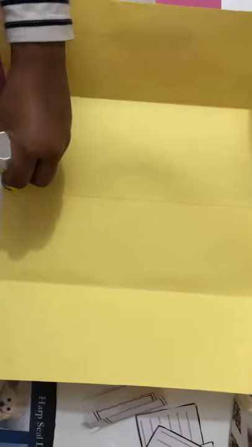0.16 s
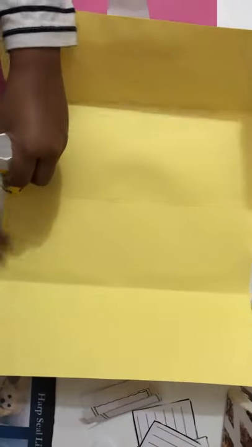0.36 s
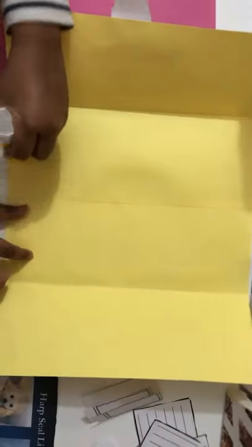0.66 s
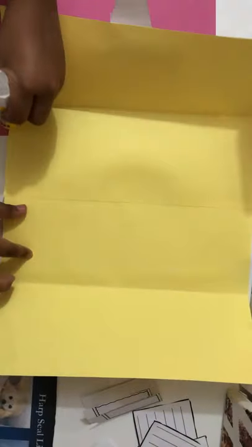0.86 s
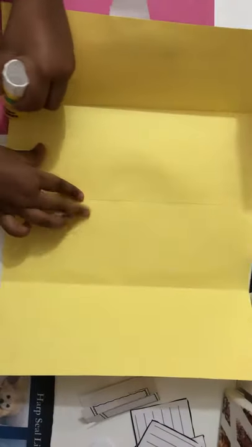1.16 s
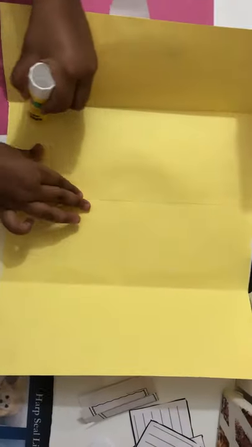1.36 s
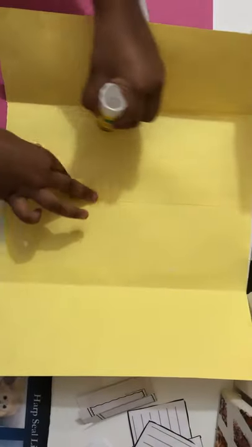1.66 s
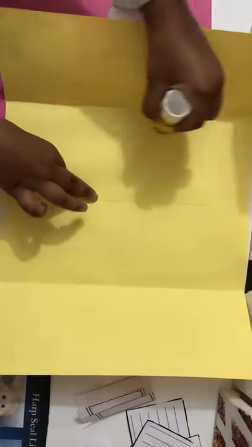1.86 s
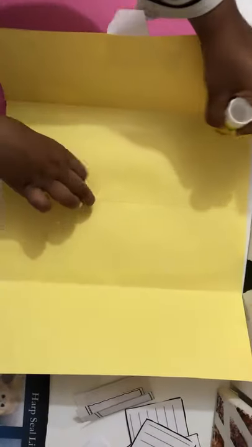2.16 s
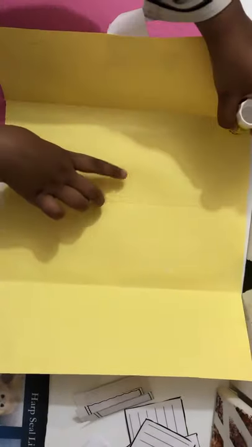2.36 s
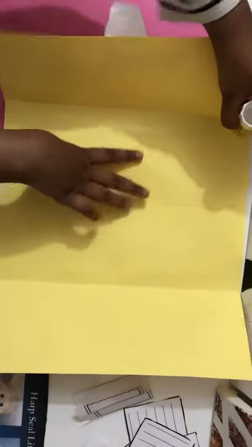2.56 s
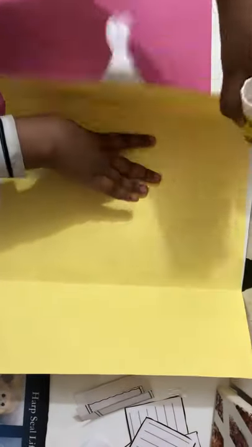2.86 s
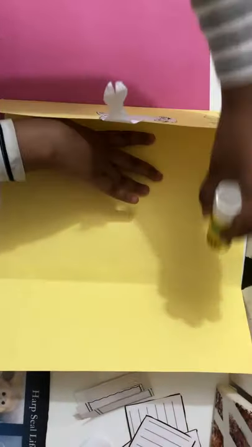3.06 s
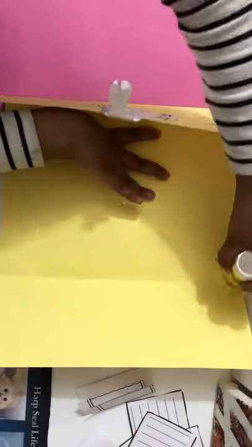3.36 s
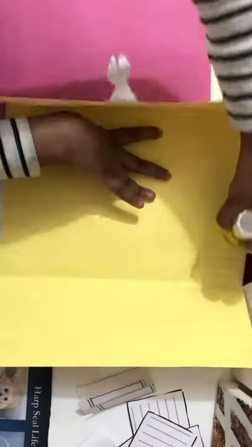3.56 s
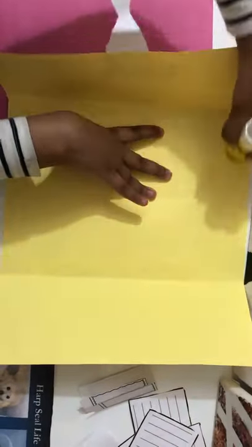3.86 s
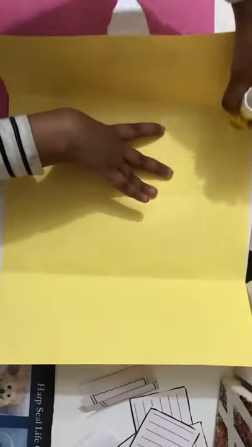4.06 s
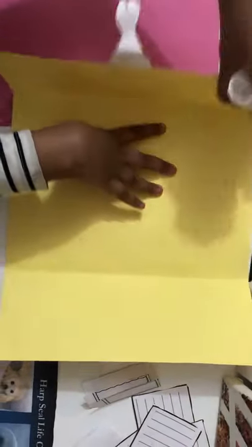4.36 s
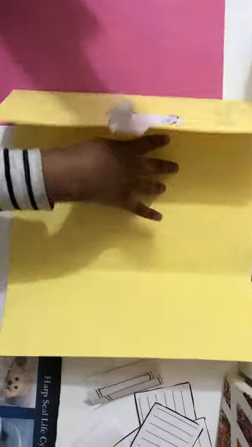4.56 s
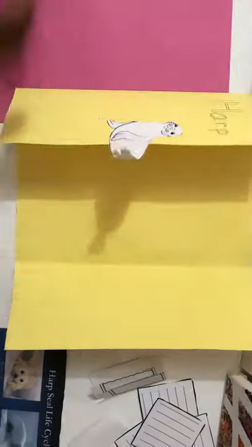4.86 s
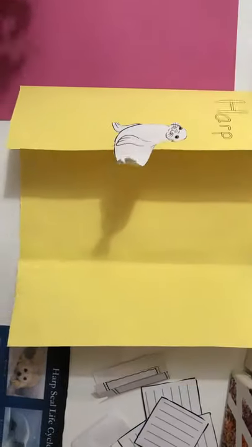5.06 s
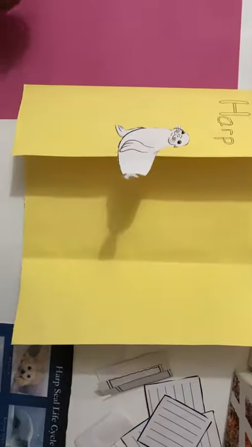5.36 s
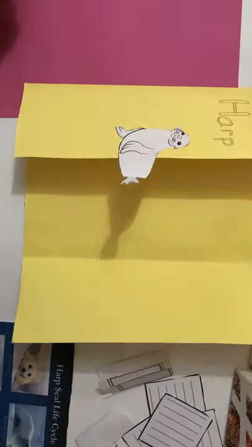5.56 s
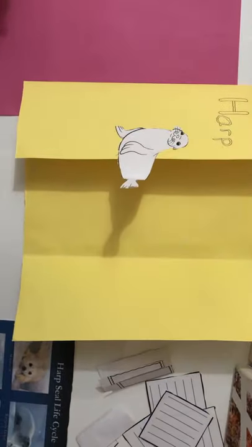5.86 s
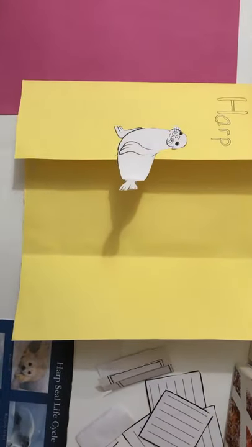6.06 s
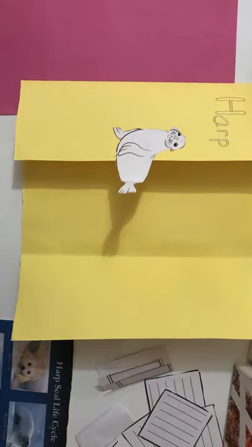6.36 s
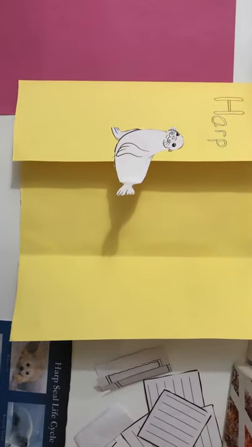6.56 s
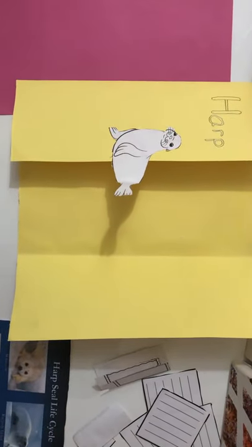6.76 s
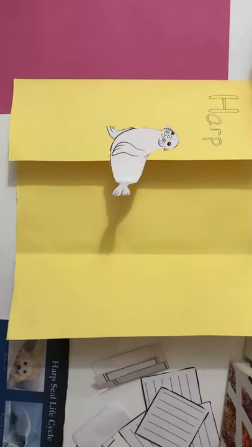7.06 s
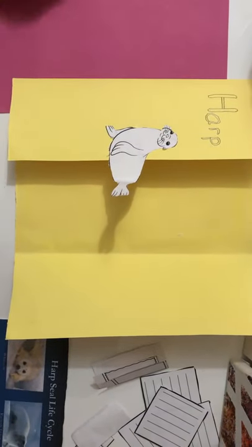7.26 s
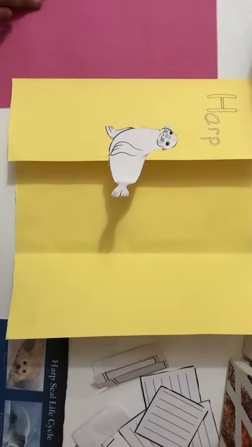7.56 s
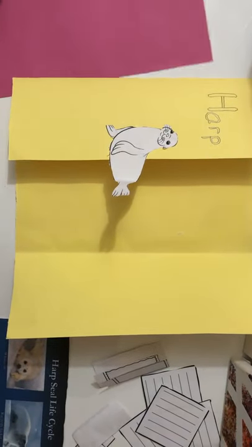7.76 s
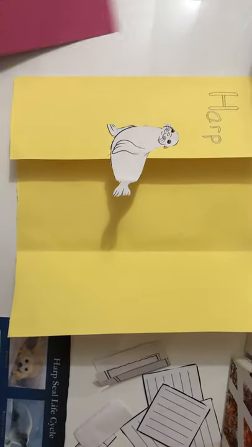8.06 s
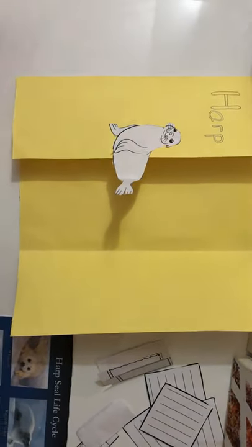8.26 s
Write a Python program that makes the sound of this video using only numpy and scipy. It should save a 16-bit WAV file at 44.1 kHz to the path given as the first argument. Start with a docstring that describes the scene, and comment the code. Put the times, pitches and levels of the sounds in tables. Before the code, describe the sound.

In a small, faintly humming room, close paper handling is heard: a glue stick swishing over card, brief scuffs, dull pops and light taps on a table. The rubbing thins to a few faint ticks. Near the end a hard object knocks sharply on the tabletop, the loudest sound, and a paper sheet slides off, fluttering and catching as it goes.

```python
"""A glue stick rubs along folded card on a table in a small room, hissing by stick-slip friction.
The card scuffs, buckles with dull pops and ticks as its edges flick free; blows of stick and hands
excite the damped modes of the tabletop. Something hard is set down with one sharp knock, then a sheet
is dragged away, fluttering and catching. A ceiling echo and a short reverberation follow the sounds,
over the low rumble and hum of the room."""
import sys
import numpy as np
from scipy import signal
from scipy.fft import rfft, irfft, next_fast_len
from scipy.io import wavfile
from scipy.ndimage import uniform_filter1d, map_coordinates

SR = 44100
rng = np.random.default_rng(int(sys.argv[2]) if len(sys.argv) > 2 else 0)


def to_wav(sig):
    """Store sig (one row per channel, or 1-D mono) as 16-bit WAV at the path in sys.argv[1].

    Samples outside -1..1 are clipped; the rate is SR.
    """
    pcm = np.clip(np.atleast_2d(sig), -1, 1) * 32767
    pcm = np.round(pcm).astype(np.int16)
    wavfile.write(sys.argv[1], SR, pcm.T)  # frames by channels


N = 370440

# spectrum of the room's rumble and hiss: f/Hz, level/dB
AIR_SPECTRUM = [(15, -19), (25, -54), (47, -8), (102, 1.5), (123, -4), (200, -5.5), (222, -12.5),
                (342, -15), (500, -24.5), (857, -29), (1320, -34), (2890, -36), (4450, -38), (8970, -38.5),
                (15800, -43)]
# narrow bands of hum and whine: f/Hz, rms level/dB
HUM_BANDS = [(54, -66), (99, -67), (193, -67), (1712, -91.5), (8694, -82)]
# quick scuffs: start t/s, end t/s, final level/dB
SCUFF_SPANS = [(0.044, 0.118, -52.5), (0.136, 0.181, -42.5), (0.83, 0.863, -53.5), (1.162, 1.207, -51),
               (2.128, 2.15, -42), (2.174, 2.269, -51.5), (2.381, 2.431, -51), (2.431, 2.466, -48.5),
               (2.576, 2.592, -52.5), (4.34, 4.359, -52), (4.628, 4.636, -42), (8.17, 8.195, -61),
               (8.285, 8.307, -52)]
# spectrum of a scuff: f/Hz, level/dB
SCUFF_SPECTRUM = [(200, -14), (500, -5.5), (1400, 0.5), (2300, 0.5), (3300, 2.5), (5500, 2.5), (9500, -3.5),
                  (12000, -7), (15500, -14)]
# buckles of the card: t/s, level/dB, T60/s, cut-off f/Hz
BUCKLES = [(.067, -40.5, 0.11, 3800), (.933, -55, 0.046, 2000), (2.15, -34, .11, 2100),
           (2.562, -49, 0.23, 2930), (2.606, -41.5, 0.18, 1470), (2.763, -34.5, .07, 1880),
           (2.8315, -32.5, 0.076, 1760), (2.858, -28.5, 0.13, 2740), (2.903, -46, 0.15, 1650),
           (3.42, -47, 0.077, 1900), (3.472, -54, 0.087, 1780), (4.06, -44.5, 0.12, 1600),
           (4.157, -45, 0.1, 1260), (4.357, -34.5, 0.15, 2440)]
# spectrum of buckling card: f/Hz, level/dB
BUCKLE_SPECTRUM = [(60, -31), (150, -0.5), (330, -3.5), (550, -0.5), (1000, -0.5), (1700, 3.5), (3000, 1),
                   (7000, 2), (15000, 22)]
# ticks of paper edges and tacky glue: t/s, level/dB
EDGE_TICKS = [(0.072, -33.5), (.457, -43.5), (1.116, -51), (1.17, -40), (2.129, -36), (2.4604, -32.5),
              (2.722, -47), (2.7925, -45.5), (2.85, -35.5), (2.863, -41), (3.825, -49), (4.398, -41),
              (4.6309, -37), (5.5922, -54), (5.7408, -51.5), (6.669, -53.5), (6.9503, -52), (7.0732, -51),
              (7.1474, -52.5), (7.478, -47), (8.1, -39.5), (8.1266, -41.5)]
# spectrum of a tick: f/Hz, level/dB
TICK_SPECTRUM = [(300, 1.5), (1200, -30), (3000, -2.5), (6000, -2.5), (9000, -5), (12000, -15.5),
                 (15500, -34)]
# spells of crackle as glue lets go or the card settles: start t/s, end t/s, level/dB
CRACKLE_SPELLS = [(3.382, 3.64, -52.5), (4.047, 4.288, -56.5), (6.758, 7.15, -61)]
# blows on the table: t/s, level/dB, cut-off f/Hz, struck spot's f/Hz, its gain/dB, bright snap level/dB
BLOWS = [(0.0921, -25, 171, 236, 16.5, -37), (0.4576, -49.5, 900, 404, -4, -58),
         (1.197, -30.5, 1100, 486, 7.5, -34.5), (3.338, -38, 160, 136, 24.5, -52),
         (5.3933, -27.5, 1200, 806, 2.5, -37.5), (7.297, -9.5, 6000, 400, -8, -33),
         (8.35, -53.5, 697, 870, 13, -72)]
# modes of the tabletop: f/Hz, level/dB, T60/s
TABLE_MODES = [(134.8, -25, 0.55), (192.8, -25, 0.45), (229, -25.5, 0.22), (270, -20, 0.097),
               (331.7, -30, 0.19), (369, -15.5, 0.079), (421, -17.5, 0.11), (516, -22, 0.13),
               (645, -27.5, 0.27), (698.5, -25, 0.16), (817, -26.5, 0.17), (921, -18, 0.061),
               (972, -14, 0.035), (1051, -29, 0.19), (1360, -12, 0.021), (1436, -23.5, 0.14),
               (1565, -16, 0.036), (1764, -38, 0.23)]
# spectrum of the contact in a blow: f/Hz, level/dB
CRACK_SPECTRUM = [(250, 9), (800, 11), (1650, 6.5), (2200, -12.5), (3050, 2.5), (4000, -2.5), (6000, -6),
                  (10000, -8), (15500, -7.5)]
# long pass of the glue stick: t/s, hiss level/dB, body level/dB
LONG_PASS = [(1.62, -62.5, -75), (1.66, -50, -59), (1.71, -55, -59), (1.814, -55, -68),
             (1.85, -52.5, -50.5), (1.966, -59, -62.5), (1.984, -54.5, -55), (2.022, -62, -71),
             (2.046, -56, -64), (2.12, -63.5, -65)]
# strokes of stick and hands: fastest at t/s, rise/s, fall/s, hiss level/dB, body over hiss/dB
SHORT_STROKES = [(.19, .02, 0.2, -55.5, -12), (.47, 0.15, 0.19, -64.5, -4.5), (.83, 0.3, 0.16, -60, -0.5),
                 (.945, 0.017, 0.05, -56.5, -13.5), (1.6, 0.52, 0.069, -60, -14),
                 (2.48, .04, 0.29, -60.5, -12), (2.85, 0.23, 0.044, -57.5, 2), (3.33, .3, 0.5, -65, -1),
                 (3.78, 0.15, 0.32, -57.5, -1), (4.09, 0.093, 0.3, -68, 5), (4.39, 0.12, 0.15, -59, 0),
                 (4.63, 0.12, 0.15, -57.5, -10), (5.09, 0.34, 0.08, -67, -14), (5.21, 0.024, 0.11, -69, 3),
                 (5.49, .05, 0.11, -70.5, -5), (6.04, .2, 0.38, -70, -6.5)]
# resonances of the card under the stick: f/Hz, width/Hz, level/dB
CARD_MODES = [(569, 73, -0.5), (750, 59, 0), (1005, 113, -1), (1580, 200, -2.5), (3170, 460, -5),
              (4000, 240, -7.5), (4950, 500, -8.5), (9300, 610, -17)]
# spectrum of sliding hiss: f/Hz, level/dB
HISS_SPECTRUM = [(600, -43), (1500, 1.5), (3000, 0), (5000, 2), (7000, 1.5), (9500, -1), (12000, -4),
                 (15500, -8.5)]
# spectrum of the rubbed card's body: f/Hz, level/dB
BODY_SPECTRUM = [(150, -33.5), (350, 14.5), (600, -3.5), (1100, -4.5), (1900, 2.5), (3000, -30),
                 (8000, -69)]
# modes of the hard object: f/Hz, level/dB, T60/s
OBJECT_MODES = [(2990, -16.5, 0.017), (5030, -12.5, 0.007), (8050, -30, 0.0069)]
# tugs on the sheet: fastest at t/s, rise/s, fall/s, hiss level/dB, flutter over hiss/dB
SHEET_TUGS = [(7.53, 0.11, 0.18, -62, -4), (7.71, 0.2, 0.21, -53.5, -12), (7.97, 0.26, 0.14, -54, -1.5),
              (8.19, 0.2, 0.16, -65.5, 11.5)]
# the sheet catches and jumps free: t/s, level/dB
SHEET_CATCHES = [(7.766, -36.5), (7.865, -44.5), (7.944, -45.5), (8, -48.5), (8.06, -46.5), (8.102, -43),
                 (8.169, -43)]
# resonances of the sheet: f/Hz, width/Hz, level/dB
SHEET_MODES = [(387, 19, 1.5), (866, 56, -6.5), (1133, 100, -9.5), (1434, 35, -3.5), (1750, 100, -14),
               (2100, 150, -11)]
# reverberation time of the room: f/Hz, T60/s
ROOM_DECAY = [(150, 0.56), (600, 0.24), (2000, 0.4), (6000, 0.29), (14000, 0.15)]
# colour of the reverberation: f/Hz, gain/dB
WALL_COLOUR = [(300, 5.5), (900, 4.5), (1600, -4), (2500, -3), (10000, 0)]


def amp(db):
    """Amplitude grows tenfold for every 20 dB."""
    return 10 ** (np.asarray(db) / 20)


def unit(x):
    """Normalisation to rms 1."""
    return x / np.sqrt(np.mean(x ** 2) + 1e-20)


def along(points, hz):
    """Interpolation of (f/Hz, value) points on a logarithmic frequency axis."""
    f, v = np.transpose(points)
    return np.interp(np.log(hz + 1), np.log(f + 1), v)


def filtered(x, response):
    """Linear filtering multiplies the spectrum by a complex frequency response."""
    size = next_fast_len(len(x) + 8192)
    return irfft(rfft(x, size) * response(np.fft.rfftfreq(size, 1 / SR)), size)[:len(x)]


def coloured(x, spectrum):
    """Spectral shaping by (f/Hz, level/dB) points, at rms 1."""
    return unit(filtered(x, lambda hz: amp(along(spectrum, hz))))


def softened(x, cut_hz, order):
    """A soft contact acts as a low-pass filter."""
    return signal.lfilter(*signal.butter(order, cut_hz, fs=SR), x)


def wobble(per_s):
    """Random modulation: a smooth curve through per_s knots a second."""
    knots = rng.standard_normal(int(N * per_s / SR) + 4)
    return map_coordinates(knots, [np.arange(N) * per_s / SR])


def add(track, s, sound):
    """Superposition: a sound joins the track at s seconds."""
    part = track[max(round(s * SR), 0):][:len(sound)]
    part += sound[:len(part)]


def resonances(modes, f):
    """Forced response of (f/Hz, width/Hz, level/dB) resonators of alternating sign."""
    return sum((-1) ** k * amp(db) * 1j * f * width / (centre ** 2 - f ** 2 + 1j * f * width)
               for k, (centre, width, db) in enumerate(modes))


def ringing(modes, t):
    """Free vibration: each mode decays exponentially after a blow."""
    return sum(amp(db - 60 * t / t60) * np.sin(2 * np.pi * hz * t) for hz, db, t60 in modes)


def dispersed(x, lag_s):
    """Dispersion: bending waves carry treble faster than bass; lag_s scales the delay."""
    return filtered(x, lambda hz: np.exp(-2j * np.pi * lag_s * (2 * np.sqrt(1000 * hz) - hz / 3)))


def friction(slips_per_s, spread_db, grain):
    """Stick-slip friction: fibres catch and let go in uneven slips over a smooth rush."""
    slips = (rng.random(N) < slips_per_s / SR) * rng.standard_normal(N)
    slips *= amp(spread_db * np.minimum(rng.standard_normal(N), 2))
    return unit(rng.standard_normal(N) + grain * unit(slips))


def patchy(x, depth_db):
    """A moving contact excites ever different bands of the sheet."""
    bands = signal.stft(x, nperseg=256)[2]
    field = rng.standard_normal(bands.shape)
    for _ in range(2):
        field = uniform_filter1d(uniform_filter1d(field, size=4, axis=0), size=7, axis=1)
    return signal.istft(bands * amp(depth_db * unit(field)), nperseg=256)[1][:N]


def background():
    """Broadband noise gives rumble and hiss; narrowband noise wavers as hum and whine."""
    air = amp(-58.5) * coloured(rng.standard_normal(N), AIR_SPECTRUM)
    for centre, db in HUM_BANDS:
        width = 7 + 0.011 * centre
        band = filtered(rng.standard_normal(N), lambda hz: 1 / (1 + ((hz - centre) / width) ** 2))
        air += amp(db) * unit(band)
    return air


def scuffs(swell_db=6.5):
    """Friction noise swells through each short slide until the contact lets go."""
    t, push = np.arange(N) / SR, np.zeros(N)
    for start, end, db in SCUFF_SPANS:
        on = (t > start) & (t < end)
        push[on] += amp(db + swell_db * (t[on] - end) / (end - start))
    slips = patchy(friction(slips_per_s=1300, spread_db=4, grain=0.37), depth_db=2)
    slips *= amp(wobble(150))
    return uniform_filter1d(push, size=300) * coloured(slips, SCUFF_SPECTRUM)


def buckling():
    """Buckling releases a pop and a run of snaps, duller as the tension relaxes."""
    out, t = np.zeros(N), np.arange(SR // 4) / SR
    snaps = friction(slips_per_s=700, spread_db=5, grain=0.85)
    # the bright snap of a blow, on card or bare table, and the sheet's catches; columns as in BUCKLES
    blow_snaps = [(s, snap_db, 0.046, 3700) for s, *_, snap_db in BLOWS]
    catches = [(s, db, 0.082, 3550) for s, db in SHEET_CATCHES]
    for s, db, t60, cut_hz in BUCKLES + blow_snaps + catches:
        rise_s = 0.028 * t60  # a larger buckle takes longer both to build and to die
        run = np.roll(snaps, -round(s * SR))[:len(t)]
        run[round(0.0012 * SR)] += 13  # the opening pop
        run = coloured(run, BUCKLE_SPECTRUM)
        taut = unit(softened(run, cut_hz, order=3))
        slack = unit(softened(run, 0.45 * cut_hz, order=3))
        tension = np.exp(-t / 0.0086)
        envelope = amp(db - 60 * t / t60) * (1 - np.exp(-t / rise_s))
        add(out, s, (tension * taut + (1 - tension) * slack) * envelope)
    return dispersed(out, lag_s=0.001409)


def ticks():
    """A sudden release or contact gives a broadband transient; faint ones last longer."""
    out, t = np.zeros(N), np.arange(SR // 20) / SR
    # a sharp tick opens each blow
    blow_ticks = [(s - 0.0013, snap_db - 0.5) for s, *_, snap_db in BLOWS]
    for s, db in EDGE_TICKS + blow_ticks + crackles(count=4) + judder(count=8):
        t60 = np.interp(db, [-55, -35], [0.024, 0.012])
        envelope = amp(-60 * t / t60) * (1 - np.exp(-t / 0.00016))
        flick = coloured(rng.standard_normal(len(t)), TICK_SPECTRUM) * envelope
        add(out, s, amp(db - 3) * np.sqrt(0.021 / t60) * flick)
    return out


def crack(t, t60):
    """An impact is a brief broadband burst, here smooth in spectrum and of unit energy."""
    noise = rfft(rng.standard_normal(len(t)) * amp(-60 * t / t60))
    magnitude = amp(along(CRACK_SPECTRUM, np.fft.rfftfreq(len(t), 1 / SR)))
    burst = irfft(noise / abs(noise) * magnitude, len(t)) * amp(-20 * t / t60)
    return burst / np.linalg.norm(burst)


def knocks():
    """Impact excites the tabletop's modes; each spot favours its own band, soft contacts are dull."""
    out, t = np.zeros(N), np.arange(SR * 3 // 4) / SR
    for s, db, cut_hz, spot_hz, lift_db, _ in BLOWS:
        blow = ringing(TABLE_MODES, t) + amp(11) * crack(t, t60=0.026)
        blow = filtered(blow, lambda f: 1.5 + resonances([(spot_hz, 0.56 * spot_hz, lift_db)], f))
        add(out, s, amp(db) * softened(blow, cut_hz, order=1))
    bass_hz = 230  # air slips round the panel's edge: it radiates little below this
    radiated = signal.lfilter(*signal.butter(2, bass_hz, "high", fs=SR), out)
    return dispersed(radiated, lag_s=0.002904)


def strokes(rows, exponent=1.67):
    """Hiss and body gains follow a power law of the hand's speed, which rises and falls linearly."""
    t, out = np.arange(N) / SR, np.zeros((2, N))
    for s, rise, fall, db, body_db in rows:
        speed = np.interp(t, [s - rise, s, s + fall], [0, 1, 0])
        out += amp([[db], [db + body_db]]) * speed ** exponent
    return out


def long_pass(fade_s=0.02):
    """Uneven pressure modulates the hiss and body gains as the stick crosses the card."""
    t = np.arange(N) / SR
    times, *levels = np.transpose(LONG_PASS)
    fade = np.clip(np.minimum(t - times[0], times[-1] - t) / fade_s + 1, 0, 1)
    return np.array([fade * amp(np.interp(t, times, db)) for db in levels])


def rubbing():
    """Sliding friction makes the fibres hiss and drives the card's resonances."""
    hiss, body = long_pass() + strokes(SHORT_STROKES)
    slips = patchy(friction(slips_per_s=900, spread_db=3, grain=0.6), depth_db=1.8)
    slips *= amp(1.1 * wobble(70))
    bright = filtered(slips, lambda f: 0.4 + abs(resonances(CARD_MODES, f)))
    hollow = filtered(slips, lambda f: resonances(CARD_MODES, f))
    return hiss * coloured(bright, HISS_SPECTRUM) + body * coloured(hollow, BODY_SPECTRUM)


def judder(count, start_s=3.146, slips_per_s=76, db=-57.5):
    """Periodic stick-slip of the skidding stick, as ticks (t/s, level/dB)."""
    return [(start_s + k / slips_per_s, db) for k in range(count)]


def crackles(count):
    """Glue and settling card release stress at irregular moments, as ticks (t/s, level/dB)."""
    return [(start + (end - start) * (k + rng.random()) / count, db)
            for start, end, db in CRACKLE_SPELLS for k in range(count)]


def clack():
    """The hardest blow excites the object's own high, heavily damped modes."""
    out, t = np.zeros(N), np.arange(SR // 20) / SR
    s, db = max(BLOWS, key=lambda row: row[1])[:2]
    add(out, s, amp(db + 6.5) * ringing(OBJECT_MODES, t) * (1 - np.exp(-t / 0.00057)))
    return out


def dragging(catch_db=-11.5, catch_rise_s=0.008):
    """Friction makes the tugged sheet hiss and drives its broad resonances, harder at each catch."""
    hiss, flutter = strokes(SHEET_TUGS)
    age = np.arange(SR // 10) / SR / catch_rise_s
    for s, db in SHEET_CATCHES:
        add(flutter, s, amp(db + catch_db) * age * np.exp(1 - age))
    slips = patchy(friction(slips_per_s=1200, spread_db=4, grain=0.6), depth_db=1.6)
    sheet = unit(filtered(slips * amp(3.5 * wobble(45)), lambda f: resonances(SHEET_MODES, f)))
    edge = filtered(slips, lambda f: 1 + resonances([(3200, 1280, -0.52)], f))
    return hiss * coloured(edge, HISS_SPECTRUM) + flutter * sheet


def room(x, echo_s, echo_db, tail_db):
    """Reflection gives one ceiling echo and a diffuse tail that dies soonest in the high treble."""
    hz, t, bands = signal.stft(rng.standard_normal(SR * 3 // 4), SR, nperseg=256)
    decay = amp(-60 * t / along(ROOM_DECAY, hz)[:, None])
    tail = signal.istft(bands * decay, SR, nperseg=256)[1]
    tail *= 1 - np.exp(-np.arange(len(tail)) / SR / 0.0027)
    wet = signal.fftconvolve(x, tail / np.linalg.norm(tail))[:N]
    wet = filtered(wet, lambda f: amp(tail_db + along(WALL_COLOUR, f)))
    echo = filtered(x, lambda f: np.exp(-2j * np.pi * f * echo_s))
    return wet + amp(echo_db) * echo


def scene():
    """Direct sound, reflections and background superpose in one channel; the close clack stays dry."""
    near = rubbing() + dragging() + scuffs() + buckling() + ticks() + knocks()
    reflections = room(near, echo_s=0.0142, echo_db=-16.5, tail_db=-11.5)
    return (near + clack() + reflections + background())[None]


def record(dry):
    """The microphone is a band-pass filter: it drops the deepest bass and the highest treble."""
    low_hz, top_hz = 38, 15870

    def passband(hz):
        treble_cut = np.clip((top_hz - hz) / 300 + 0.5, 0, 1)
        return treble_cut * hz ** 4 / np.hypot(hz ** 4, low_hz ** 4)
    return np.array([filtered(x, passband) for x in dry])


dry = scene()
out = record(dry)
to_wav(out)
```